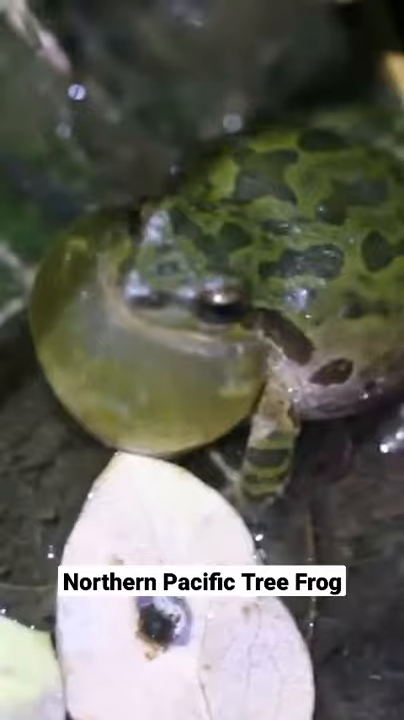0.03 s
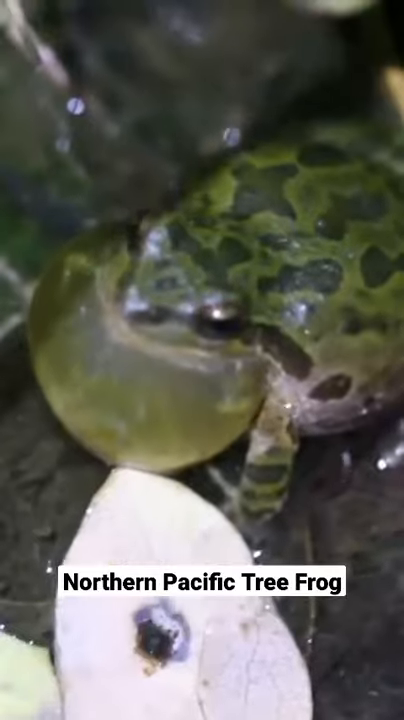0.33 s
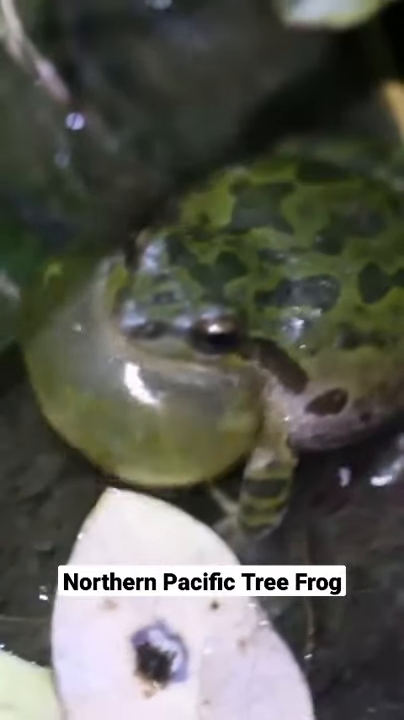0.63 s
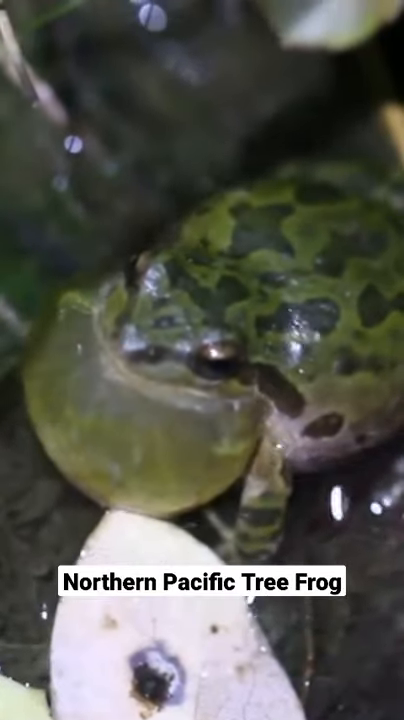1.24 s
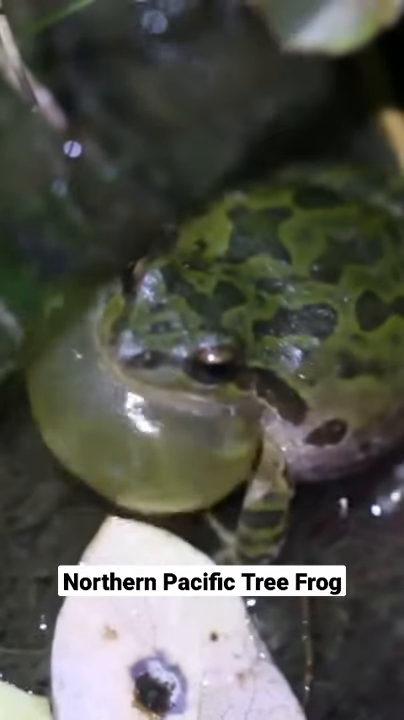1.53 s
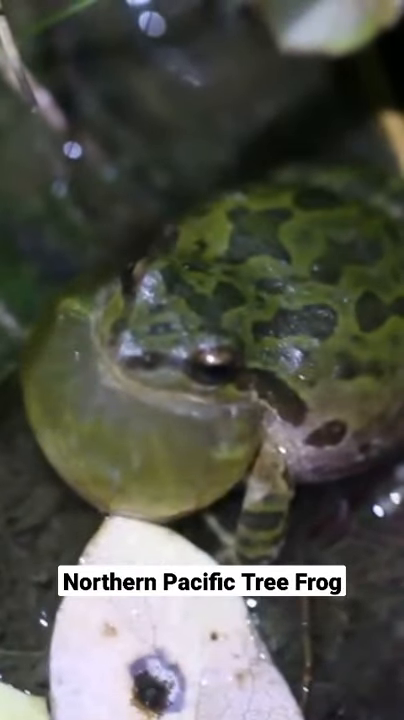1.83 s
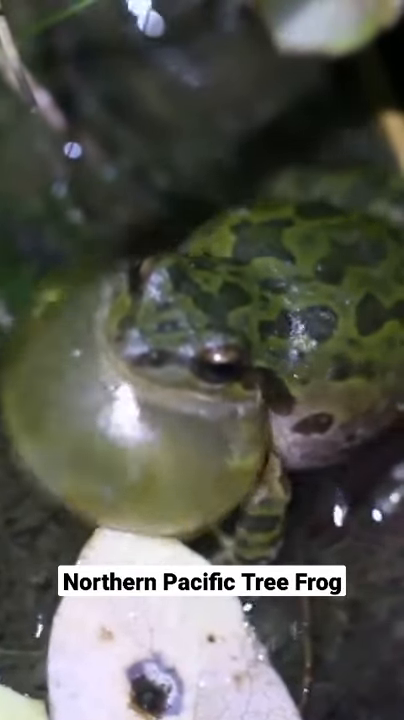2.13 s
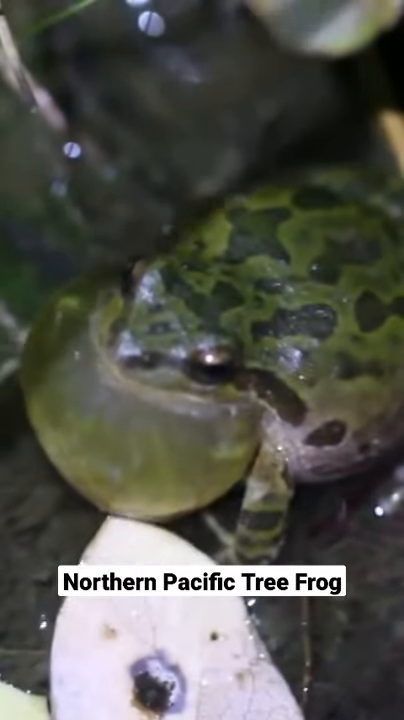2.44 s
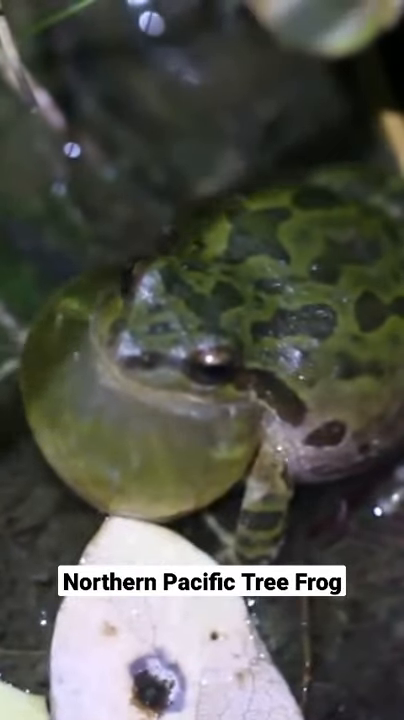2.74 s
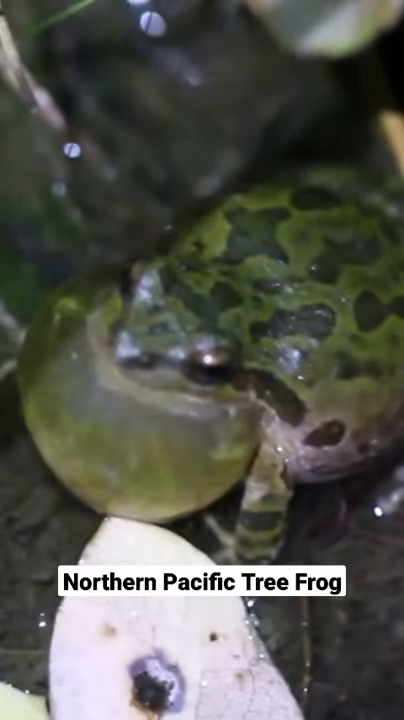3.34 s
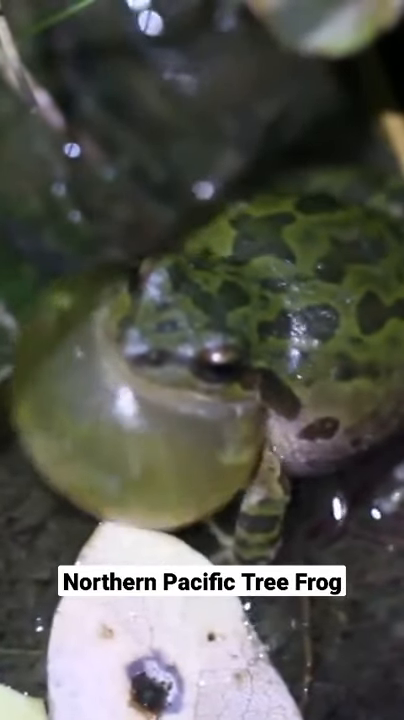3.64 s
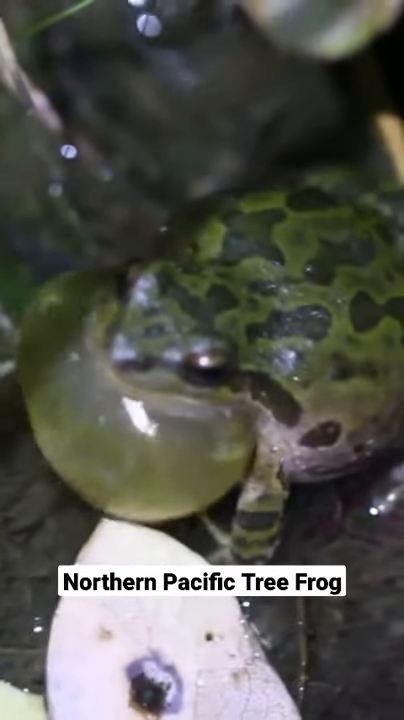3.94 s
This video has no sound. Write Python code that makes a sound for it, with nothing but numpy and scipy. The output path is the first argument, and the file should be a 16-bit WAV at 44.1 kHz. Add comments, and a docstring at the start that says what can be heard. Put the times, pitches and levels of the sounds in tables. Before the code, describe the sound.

Loud two-part tree frog croaks, a quick rasp and then a peep, repeat steadily at close range among leaves at night. A slightly quieter neighbour starts first and takes turns with it, with faint distant frogs behind.

```python
"""Among leaves at night, a tree frog croaks close by: a rasp of about ten pulses, then a short, higher
peep. A neighbour answers in the gaps, and two fainter frogs call further off. Each pulse snaps the
vocal cords open and sets them ringing; the vocal sac favours the second harmonic. Leaves and ground
scatter the calls, the woods echo faintly, and a distant chorus and a low rumble lie behind."""
import sys
import numpy as np
from scipy import signal
from scipy.fft import rfft, irfft, next_fast_len
from scipy.io import wavfile

SR = 44100
rng = np.random.default_rng(int(sys.argv[2]) if len(sys.argv) > 2 else 0)


def unload_wav(signal):
    """Save mono or channel-first audio to the path in sys.argv[1] as 16-bit WAV at rate SR, clipped to [-1, 1]."""
    wavfile.write(
        sys.argv[1],
        SR,
        np.round(np.clip(np.atleast_2d(signal).T, -1, 1) * 32767).astype(np.int16),
    )


N = 176400

# Scatter from leaves and ground. Each row: frequency in Hz, time to fade by 60 dB in seconds.
LEAF_DECAY = [(300, 0.035), (1100, 0.065), (2400, 0.071), (4000, 0.043), (10000, 0.078)]


def amp(db):
    """Decibels to gain."""
    return 10 ** (np.asarray(db) / 20)


def unit(x):
    """Scale to rms 1."""
    return x / np.sqrt(np.mean(x ** 2) + 1e-20)


def along(points, hz):
    """Read a curve of (Hz, value) points on a log frequency axis."""
    freqs, values = np.transpose(points)
    return np.interp(np.log(hz + 1), np.log(freqs + 1), values)


def wobble(rate):
    """A wandering random curve, rate knots a second."""
    knots = rng.standard_normal(int(N * rate / SR) + 2)
    return np.interp(np.arange(N) * rate / SR, np.arange(len(knots)), knots)


def filtered(x, response):
    """Equalise x with a gain given as a function of Hz."""
    size = next_fast_len(N + SR // 2)
    return irfft(rfft(x, size) * response(np.fft.rfftfreq(size, 1 / SR)), size)[:N]


def noise(colour):
    """Coloured noise of rms 1."""
    return unit(filtered(rng.standard_normal(N), lambda hz: amp(along(colour, hz))))


def impulse(colour, size=2048):
    """A minimum-phase click of the given colour, peak 1."""
    cepstrum = irfft(np.log(amp(along(colour, np.fft.rfftfreq(size, 1 / SR)))))
    cepstrum[1:size // 2] *= 2
    cepstrum[size // 2 + 1:] = 0
    click = irfft(np.exp(rfft(cepstrum)))
    return click / np.abs(click).max()


def add(track, start_s, sound):
    """Mix a sound into a track."""
    part = track[max(round(start_s * SR), 0):][:len(sound)]
    part += sound[:len(part)]


def echo(x, decay):
    """A diffuse tail in which each frequency dies at its own speed."""
    hz, t, bands = signal.stft(rng.standard_normal(SR // 2), SR, nperseg=128)
    fade = amp(-60 * t / along(decay, hz)[:, None])
    tail = signal.istft(bands * fade, SR, nperseg=128)[1]
    tail = np.pad(tail, (130, 0))  # 3 ms of pre-delay
    return signal.oaconvolve(x, tail / np.linalg.norm(tail))[:N]


def rumble():
    """A low rumble with faint hiss that swells and sinks."""
    # Each row: frequency in Hz, relative level in dB.
    colour = [(25, -24), (70, -16), (125, -6.5), (250, -3), (380, 1), (600, -4.5), (900, -8.5),
              (1600, -16.5), (3000, -22.5), (6000, -23.5), (10000, -24), (11500, -33), (12200, -23.5),
              (13000, -34.5), (15500, -46)]
    # Each row: time in seconds, relative level in dB.
    swells = [(0.1, -67.5), (0.31, -64.5), (0.54, -72.5), (0.7, -73), (1.19, -65), (1.45, -73.5),
              (2.0, -66.5), (2.21, -74), (2.45, -74), (2.74, -64.5), (2.84, -62.5), (3.03, -73.5),
              (3.55, -68.5), (3.95, -76)]
    swell_db = np.interp(np.arange(N) / SR, *np.transpose(swells))
    return noise(colour) * amp(swell_db + 5.5 + 1.1 * wobble(5.8))


def chorus():
    """A distant chorus, blurred into flickering bands of noise."""
    # Each row: frequency in Hz, relative level in dB.
    colour = [(700, -49), (1150, -6.5), (1600, -30), (2000, -2), (2350, 5), (2600, -2.5), (3000, -24.5),
              (3500, -17.5), (4100, -9), (4800, -30), (8000, -51)]
    return noise(colour) * amp(-62.5 + 5.5 * wobble(16))


def hoarse_air():
    """The hiss of air that passes with each pulse, as a steady loop."""
    # Each row: frequency in Hz, relative level in dB.
    colour = [(700, -21.5), (1000, -0.5), (1700, -5.5), (2700, 2), (3800, 2.5), (5200, -11.5), (6300, -18),
              (7100, -16.5), (8000, -22.5), (9200, -5), (10200, -9), (11300, -22.5), (12300, -19),
              (15500, -31.5)]
    hiss = signal.fftconvolve(rng.standard_normal(SR), impulse(colour), 'valid')
    return np.resize(unit(hiss), N)


def cord_snaps(openings):
    """The click of the vocal cords snapping open."""
    # Each row: frequency in Hz, relative level in dB.
    colour = [(100, -34.5), (550, -26), (780, -18.5), (980, 6), (1500, 1), (2300, 0), (2900, -6),
              (3500, -3), (5000, -26.5), (6500, -31.5), (8000, -31.5), (9200, -22.5), (10500, -33.5),
              (12200, -34.5), (15500, -50.5)]
    return signal.oaconvolve(openings, impulse(colour))[:N]


def croaks(notes, contour, sac, jitter, sag, close_ms, close_depth, hold_ms, push_db, smear, hoarse_db):
    """Pulse trains: the cords snap open, ring with rough overtones and are shut off by the next pulse."""
    # Each row of notes: start in seconds, pulse count, base spacing in ms, base level in dB,
    # base pitch in Hz.
    # Each row of contour: progress through the note from 0 to 1, effort in dB, pitch ratio,
    # spacing ratio, pulse rise in ms, pulse decay in ms, relative snap level in dB.
    # Each row of sac: frequency in Hz, relative level of a harmonic there in dB.
    cords, airflow, push, openings = np.zeros((4, N))
    per_ms = SR / 1000
    progress, *columns = np.transpose(contour)
    harmonics = np.arange(1, 15)[:, None]
    for at, count, spacing_ms, note_db, hz in notes:
        carried_phase = 0
        for i in range(count):
            shape = [np.interp(i / max(count - 1, 1), progress, column) for column in columns]
            effort_db, ratio, stretch, rise_ms, decay_ms, snap_db = shape
            gap_ms = spacing_ms * stretch + .2 * rng.standard_normal()
            gain = amp(note_db + effort_db + 1.05 * rng.standard_normal())
            last = i == count - 1
            length_ms = 34 if last else gap_ms + 6
            ms = np.arange(int(length_ms * per_ms)) / per_ms

            envelope = (1 - np.exp(-ms / rise_ms)) * np.exp(-ms / decay_ms)
            if last:
                envelope *= np.exp(-(ms / hold_ms) ** 4)
            else:  # close ahead of the next pulse, then die away under it
                envelope *= 1 - close_depth * np.exp(-np.maximum(gap_ms - ms, 0) / close_ms)
                envelope *= np.exp(-np.maximum(ms - gap_ms, 0) / (.5 + rise_ms))

            # Fast random drift, 700 knots a second, roughens the pitch and the overtones' phases.
            knots = rng.standard_normal((len(harmonics) + 1, 64))
            drift = np.array([np.interp(ms * 700 / 1000, np.arange(64), row) for row in knots])
            pitch = hz * ratio * (1 + sag * (np.exp(-ms / 4) - .5) + jitter * drift[0])
            waver = smear * np.maximum(harmonics - 2, 0) * drift[1:]
            # A hard snap restarts the vibration; a soft opening carries it on.
            phase = 2 * np.pi * np.cumsum(pitch) / SR + (carried_phase if rise_ms > .5 else 0)
            carried_phase = phase[min(int(gap_ms * per_ms), len(ms) - 1)]

            # Upper harmonics and breath grow with effort and fade sooner.
            brightness = amp(.7 * effort_db) * np.exp(-ms / 22)
            weights = np.where(harmonics > 2, brightness, 1) * amp(along(sac, harmonics * hz * ratio))
            ring = (weights * np.sin(harmonics * phase + waver)).sum(0)
            add(cords, at, gain * envelope * ring)
            add(openings, at, [gain * amp(snap_db)])
            add(airflow, at, gain * envelope * brightness)
            add(push, at, gain * amp(effort_db) * envelope ** 2)  # a low bump under the pulse
            at += gap_ms / 1000
    voice = cords + cord_snaps(openings) + amp(hoarse_db) * airflow * hoarse_air()
    low_cut = signal.butter(6, 780, 'high', fs=SR, output='sos')  # the small sac radiates little bass
    return signal.sosfilt(low_cut, voice) + amp(push_db) * push


def far_frogs():
    """Two fainter frogs deeper in the leaves, which dull their treble."""
    # Notes. Each row: start in seconds, pulses, base spacing in ms, base level in dB, base pitch in Hz.
    faint_rasps = [(.801, 8, 7.2, -20, 1056), (1.596, 9, 6.8, -21.5, 1056), (2.385, 8, 7.2, -22.5, 1063),
                   (3.160, 9, 6.3, -23, 1059), (3.9325, 8, 6.7, -22.5, 1064)]
    faint_peeps = [(.064, 5, 6.2, -13, 1185), (.903, 5, 6.2, -15, 1189), (1.699, 5, 6.2, -16, 1184),
                   (2.489, 5, 6.2, -17.5, 1186), (3.264, 5, 7.2, -18, 1186)]
    faintest_rasps = [(.727, 10, 7.9, -31, 1154), (2.022, 10, 6.8, -31.5, 1145),
                      (2.807, 12, 7.8, -28, 1171)]
    faintest_peeps = [(.858, 3, 6, -30, 1216), (1.524, 3, 8.2, -36, 1227), (3.555, 3, 6, -29, 1221)]
    # Note contours, with the columns given in croaks.
    faint_rasp_contour = [(0, -11, .97, 1.8, 0.5, 6.7, -9), (.45, 4.5, 1, .95, 1.9, 10, -20),
                          (.75, 0, 1.02, .95, 2.1, 10, -28), (1, -14, 1.02, 0.84, 1.8, 3.6, -2)]
    faint_peep_contour = [(0, -2, .94, .9, 0.72, 7.4, -16.5), (0.249, 0, .96, 1.1, 1, 7.7, -13.5),
                          (0.551, 2, 1.03, 0.92, 1.7, 8, -20.5), (1.001, -11, 1, 1, 1.5, 13, -20.5)]
    faintest_rasp_contour = [(0, -16, .96, 1, .8, 3.3, -6.5), (0.598, 3, 1, 0.95, 1, 3.3, -14),
                             (0.999, 5.5, 1.04, 0.94, 1.5, 4.1, -35)]
    faintest_peep_contour = [(0, 2.5, .98, 1, 0.74, 6, -16), (0.501, 6.5, 1, 1, 1.5, 7, -37),
                             (1, 5, 1.01, 1, 1.6, 5, -22)]
    # Vocal sac colour and loss through the foliage. Each row: frequency in Hz, gain in dB.
    sac = [(1030, -19), (1220, -20), (2050, 2.5), (2450, -2), (3150, -24.5), (3650, -22), (4500, -43),
           (7500, -44), (9300, -33.5), (11000, -56), (15500, -36.5)]
    foliage = [(3000, 0), (7000, -1), (10000, 0), (12000, -6.5), (15500, -12.5)]
    voice = dict(sac=sac, jitter=.014, sag=.073, close_ms=1.6, close_depth=.63, hold_ms=17,
                 push_db=-45, smear=.1, hoarse_db=-34)
    calls = croaks(faint_rasps, faint_rasp_contour, **voice)
    calls += croaks(faint_peeps, faint_peep_contour, **voice)
    calls += croaks(faintest_rasps, faintest_rasp_contour, **voice)
    calls += croaks(faintest_peeps, faintest_peep_contour, **voice)
    calls = filtered(calls, lambda hz: amp(along(foliage, hz)))
    return calls + amp(-14.5) * echo(calls, LEAF_DECAY)


def neighbour_frog():
    """A lower, smoother voice that leads in with a lone tick or two."""
    # Notes. Each row: start in seconds, pulses, base spacing in ms, base level in dB, base pitch in Hz.
    ticks = [(.101, 1, 8, -19, 1020), (.9853, 1, 8, -22.5, 993), (1.741, 1, 8, -24, 996),
             (2.5296, 1, 8, -25.5, 1013), (2.5438, 1, 8, -20, 1012), (3.309, 1, 8, -24.5, 1030)]
    rasps = [(.116, 10, 6.7, -6, 1047), (1.0003, 11, 6.5, -6.5, 1040), (1.7555, 11, 6.44, -8, 1048),
             (2.5578, 9, 6.5, -6.5, 1063), (3.3235, 11, 6.54, -8.5, 1045)]
    peeps = [(.2283, 5, 6.2, -2, 1163), (1.1173, 5, 6.6, -3, 1173), (1.876, 5, 6.0, -3, 1160),
             (2.665, 5, 6.5, -3, 1174), (3.442, 5, 7.7, -3, 1168)]
    # Note contours, with the columns given in croaks.
    tick_contour = [(0, 0.012, 0.95, 1, .2, 4.9, -2.6)]
    rasp_contour = [(0, -12, .985, 1.15, .25, 3.6, -6.5), (0.199, -4.5, .985, 1.05, 0.85, 4.4, -8.5),
                    (0.502, 0, 1.0, .9, 1.7, 11, -14.5), (0.851, 4, 1.025, 1.05, 2.2, 6, -14.5),
                    (1.001, -5, 1.03, 1.1, 2.3, 3, -12.5)]
    peep_contour = [(0, -2.5, 0.94, 0.63, 0.78, 11, -8), (.25, 2, 0.97, 1.2, 1, 11, -17),
                    (.5, 0, 1.015, 1.4, 1, 9, -25), (.75, -8, 1.045, 1, 0.86, 7.6, -21.5),
                    (1, -13.5, 1.03, 0.92, 1, 10, -19.5)]
    # Vocal sac colour. Each row: frequency in Hz, gain in dB.
    sac = [(1020, -8), (1180, -16.5), (2050, 3), (2400, -5), (3100, -22.5), (3550, -13.5), (4300, -27),
           (5600, -39), (7500, -55), (8800, -56.5), (10000, -25.5), (11200, -59), (15500, -60)]
    voice = dict(sac=sac, jitter=.018, sag=.09, close_ms=1, close_depth=.5, hold_ms=18,
                 push_db=-54, smear=.11, hoarse_db=-33)
    calls = croaks(ticks, tick_contour, **voice)
    calls += croaks(rasps, rasp_contour, **voice)
    calls += croaks(peeps, peep_contour, **voice)
    return calls + amp(-12.5) * echo(calls, LEAF_DECAY)


def near_frog():
    """The closest frog, almost dry: a snappy, swelling rasp, then a higher peep."""
    # Notes. Each row: start in seconds, pulses, base spacing in ms, base level in dB, base pitch in Hz.
    rasps = [(.4288, 10, 8.03, -2, 1111), (1.2908, 10, 8.5, -2, 1121), (2.0768, 11, 8.06, -1.5, 1126),
             (2.8933, 11, 8.0, -2, 1114), (3.6564, 11, 7.97, -2, 1128)]
    peeps = [(.5492, 4, 6.7, -1.5, 1246), (1.4192, 4, 6.8, -1.1, 1245), (2.2053, 4, 6.56, -0.92, 1253),
             (3.0214, 4, 6.8, -0.94, 1250), (3.784, 4, 6.66, -1.4, 1256)]
    # Note contours, with the columns given in croaks.
    rasp_contour = [(0, -16, .97, 1.1, .25, 5.5, 0), (0.252, -7, 0.98, 1, 0.24, 6.2, 3),
                    (.45, -4, .985, .97, 0.26, 6.7, .5), (.6, 1, 1.005, .93, .5, 5, -5),
                    (0.879, 0, 1.035, 1.08, 1.3, 3.6, -13.5), (1, -6, 1.02, 1.3, .5, 2.6, -8)]
    peep_contour = [(0, -0.5, .94, 1.1, 0.2, 2.8, -1.5), (.33, 4.5, 0.99, 1.1, .8, 2.55, -15),
                    (0.669, 1.5, .995, 0.98, 1.6, 7, -19), (1.001, -2, 1.025, 1, 1.8, 14.9, -22)]
    # Vocal sac colour. Each row: frequency in Hz, gain in dB.
    sac = [(1080, -19.5), (1280, -16), (2150, 2), (2550, -2), (3350, -33), (3800, -21), (4700, -36),
           (6000, -41.5), (7700, -47), (9100, -27), (10100, -37), (11200, -46), (12300, -44), (15500, -52)]
    voice = dict(sac=sac, jitter=.014, sag=.04, close_ms=1.4, close_depth=.65, hold_ms=19.9,
                 push_db=-41.5, smear=.09, hoarse_db=-27)
    calls = croaks(rasps, rasp_contour, **voice) + croaks(peeps, peep_contour, **voice)
    return calls + amp(-20) * echo(calls, LEAF_DECAY)


def scene():
    """All the frogs, their faint echo from the woods, and the night behind."""
    # Each row: frequency in Hz, time to fade by 60 dB in seconds.
    woods_decay = [(300, .3), (2400, 0.38), (5000, .3), (12000, .15)]
    frogs = near_frog() + neighbour_frog() + far_frogs()
    return (frogs + amp(-53.5) * echo(frogs, woods_decay) + rumble() + chorus())[None]


def record(dry):
    """Open after a moment of silence, limit peaks to full scale and cut the highest treble."""
    start_s, top_hz = .037, 15800
    gated = np.clip(dry[0], -1, 1) * (np.arange(N) / SR > start_s)
    return filtered(gated, lambda hz: hz < top_hz)[None]


dry = scene()
out = record(dry)
unload_wav(out)
```